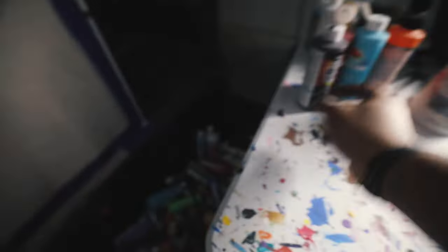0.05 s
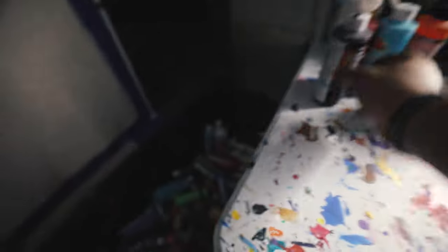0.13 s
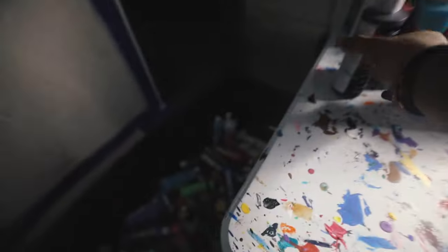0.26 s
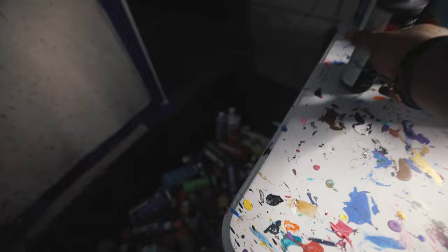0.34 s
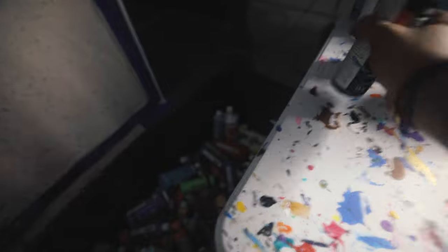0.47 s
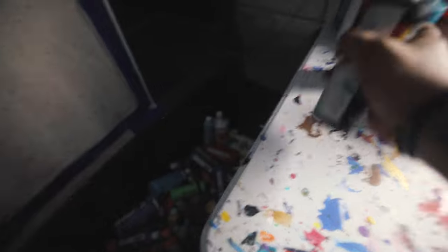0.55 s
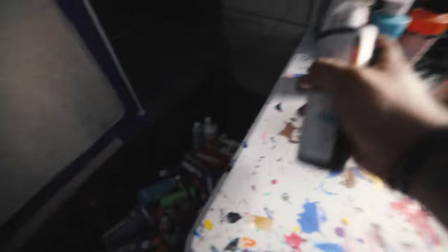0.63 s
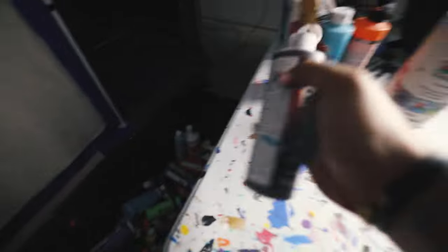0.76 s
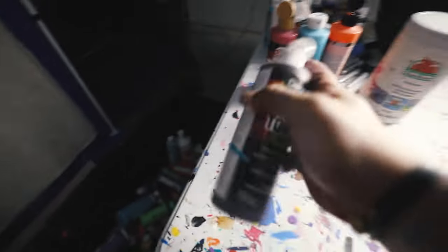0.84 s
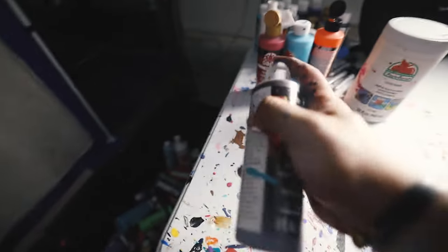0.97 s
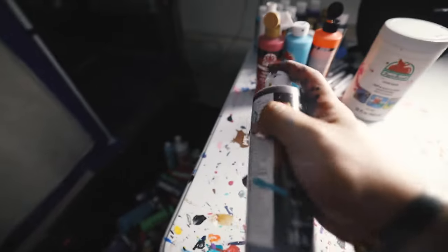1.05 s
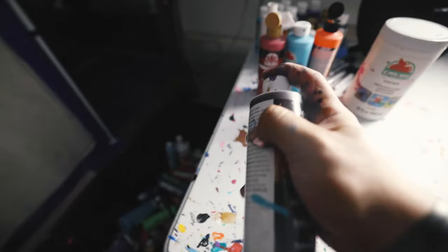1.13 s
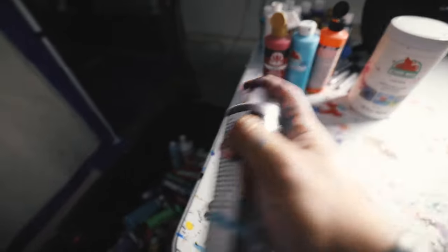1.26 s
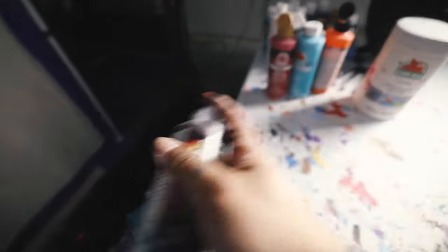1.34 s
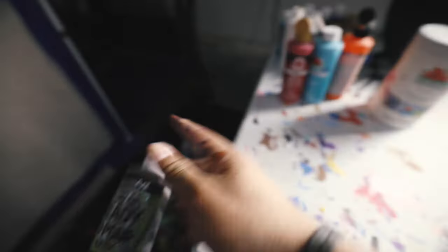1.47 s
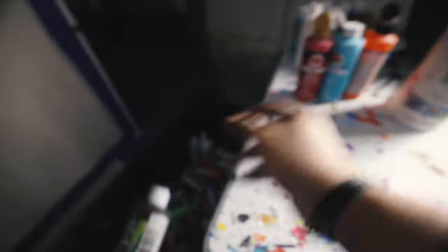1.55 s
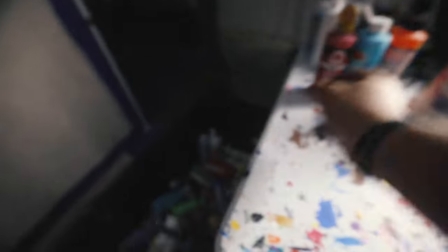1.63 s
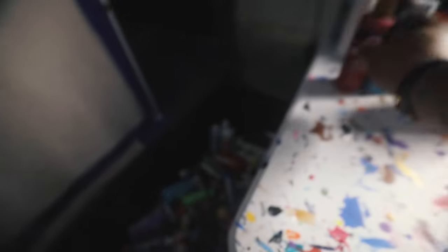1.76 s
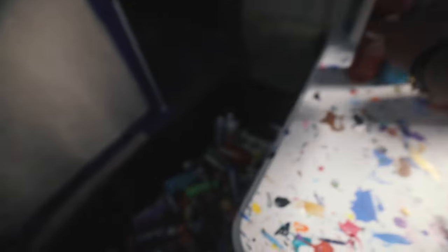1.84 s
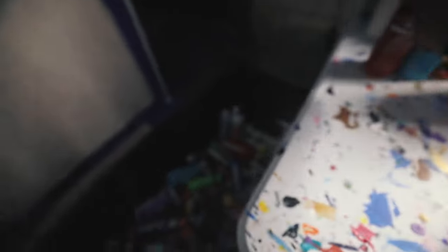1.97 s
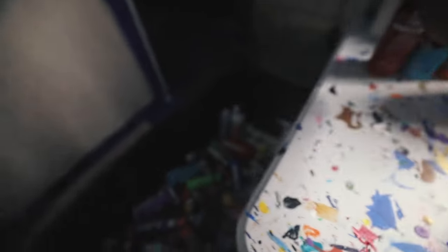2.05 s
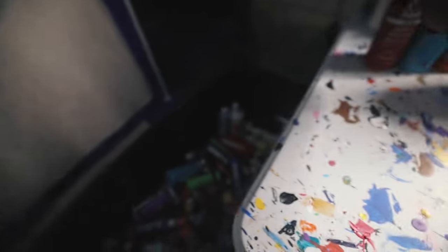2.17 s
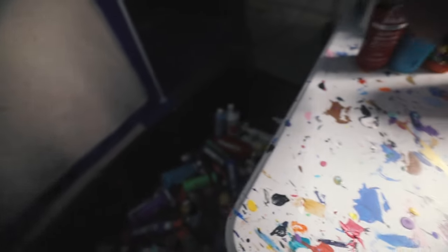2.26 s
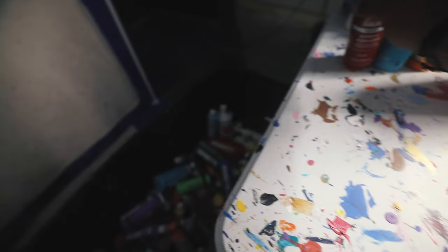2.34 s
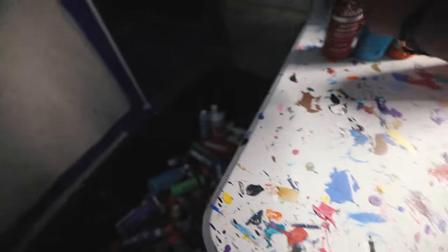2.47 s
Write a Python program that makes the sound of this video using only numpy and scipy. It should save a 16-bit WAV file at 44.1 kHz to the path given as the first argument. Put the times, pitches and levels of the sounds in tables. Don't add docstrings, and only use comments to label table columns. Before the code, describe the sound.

A plastic bottle knocks down and wobbles on a table, a hand brushes plastic, a flip cap clicks open with a short hiss, then another bottle lands hard; small quiet room, camera microphone nearby.

```python
import sys
import numpy as np
from scipy import signal
from scipy.fft import rfft, irfft, next_fast_len
from scipy.io import wavfile
from scipy.ndimage import uniform_filter1d

SR = 44100
rng = np.random.default_rng(int(sys.argv[2]) if len(sys.argv) > 2 else 0)


def boost_factor(decibels):
    exponent = np.asarray(decibels, float) / 20
    return 10 ** exponent


def dump_mix(stems):
    frames = np.atleast_2d(stems).T
    limited = np.clip(frames, -1, 1)
    pcm = np.round(limited * 32767).astype(np.int16)
    wavfile.write(sys.argv[1], SR, pcm)


N = 110250


def unit(x):
    return x / np.sqrt(np.mean(x ** 2) + 1e-20)


def along(points, hz):
    f, v = np.transpose(points)
    return np.interp(np.log(hz + 1), np.log(f + 1), v)


def filtered(x, response):
    m = next_fast_len(len(x) + 4096)
    return irfft(rfft(x, m) * response(np.fft.rfftfreq(m, 1 / SR)), m)[:len(x)]


def resonances(peaks, f):
    total = 0
    for k, (centre, width, db) in enumerate(peaks):
        damping = 1j * f * width
        total = total + (-1) ** k * boost_factor(db) * damping / (centre * centre - f * f + damping + 1e-9)
    return total


def causal(gain):
    c = irfft(np.log(gain + 1e-6))
    half = len(c) // 2
    c[1:half] *= 2
    c[half + 1:] = 0
    return np.exp(rfft(c))


def rush(spectrum, patchy_db, tones=()):
    z = signal.stft(rng.standard_normal(N), nperseg=512)[2]
    field = uniform_filter1d(rng.standard_normal(z.shape), size=5, axis=0)
    field = uniform_filter1d(field, size=4, axis=1)
    x = signal.istft(z * boost_factor(patchy_db * unit(field)), nperseg=512)[1][:N]
    return unit(filtered(x, lambda f: boost_factor(along(spectrum, f)) * (1 + np.abs(resonances(tones, f)))))


def place(hits):
    out = np.zeros(N + SR)
    for s, db, x in hits:
        out[max(round(s * SR), 0):][:len(x)] += boost_factor(db) * x / np.abs(x).max()
    return out[:N]


def hum():
    # frequency in Hz, density in dB per Hz
    rumble = [(24, -87), (40, -37), (119, -2.5), (156, -15), (301, -22.5), (356, -26.5), (600, -26.5),
              (780, -65), (1320, -120)]
    # frequency in Hz, density in dB per Hz
    breath = [(290, -77), (500, -15), (859, -8.5), (1350, -11.5), (1710, -15.5), (6000, -32),
              (14900, -39.5), (16500, -53)]
    # frequency in Hz, width in Hz, level in dB
    fan_tones = [(906, 45, 2), (3380, 270, 4)]
    return boost_factor(-44) * rush(rumble, patchy_db=0.0) + boost_factor(-53) * rush(breath, patchy_db=-2.0, tones=fan_tones)


def brushing():
    # start in seconds, length in seconds, level in dB
    brushes = [(0.0, 0.058, -55), (0.57, 0.037, -63), (0.608, 0.12, -49.5), (0.738, 0.069, -53.5),
               (0.801, 0.051, -51), (0.853, 0.074, -54.5), (0.931, 0.026, -48), (0.959, 0.062, -55),
               (1.031, 0.14, -62.5), (1.393, 0.1, -58), (2.47, 0.078, -57.5)]
    # frequency in Hz, density in dB per Hz
    skin = [(880, -28), (1500, -3), (2050, 0), (11800, -12.5), (15700, -24), (16500, -47)]
    edge_s = 0.011
    t = np.arange(N) / SR
    strokes = np.zeros(N)
    for s, length, db in brushes:
        inside = np.minimum(t - s, s + length - t)
        strokes += boost_factor(db) * np.clip(inside / edge_s + .5, 0, 1)
    return strokes * rush(skin, patchy_db=3.0)


def knocks():
    # start in seconds, peak in dB, brightness in dB per octave, rattle t60 in seconds
    contacts = [(0.001, -35.5, -13, 0.054), (0.01, -21, 0, 0.039), (0.015, -24, -2.5, 0.098),
                (0.024, -29.5, -2.5, 0.089), (0.204, -9, 5.5, 0.077), (0.22, -5, 1.5, 0.035),
                (0.226, -11.5, -1.5, 0.049), (0.233, -16, -4, 0.068), (0.247, -17.5, 2.5, 0.095),
                (0.37, -22.5, -5, 0.009), (0.443, -26, 1, 0.017), (0.4475, -18, 4, 0.045),
                (0.454, -26, -9.5, 0.036), (0.469, -16, 1.6, 0.043), (0.477, -22.5, -2, 0.02),
                (0.496, -16.5, -3.5, 0.017), (0.502, -23.5, -7, 0.033), (0.513, -25, 0, 0.029),
                (0.522, -37, -2, 0.018), (0.531, -31, -2, 0.018), (0.5393, -20, -0.5, 0.065),
                (0.545, -28, 0, 0.039), (0.646, -29.5, -15, 0.025), (1.8679, -7, 4, 0.045),
                (1.884, -2, 6, 0.017), (1.8875, -3, -3.5, 0.015), (1.899, -17.5, -15, 0.02),
                (1.9055, -13.5, 1.5, 0.017), (1.913, -15, -7.5, 0.028), (1.923, -17, -5, 0.033),
                (1.976, -35, 12, 0.012), (1.9164, -8, 4, 0.043), (1.935, -19, 4.5, 0.038),
                (2, -21.5, -3, 0.072), (2.019, -38, -2, 0.02), (2.066, -36, -5, 0.011),
                (2.039, -24, -1.5, 0.02), (2.051, -26, -0.5, 0.013), (2.111, -20, 3.5, 0.033),
                (2.116, -27, -3.5, 0.058), (2.141, -25, 0, 0.024), (2.226, -41, -2, 0.026),
                (2.237, -26, 0.5, 0.032), (2.246, -36, 2, 0.024), (2.27, -32.5, -0.5, 0.019),
                (2.303, -41, -2, 0.02), (2.376, -30.5, 7, 0.02), (2.384, -32, 2, 0.023),
                (2.392, -33, 11, 0.019)]
    # frequency in Hz, density in dB per Hz
    plastic = [(180, -16), (300, 4.5), (522, -4), (730, -2.5), (877, -4.5), (5020, -10), (11400, -25),
               (16500, -42)]
    # frequency in Hz, width in Hz, level in dB
    shell = [(724, 94, -7), (1196, 293, 1.5), (2066, 180, 4.5), (3550, 530, -3.5)]
    shell_db, shell_scatter = 6, 0.11
    contact_s, grit_db = 0.0035, 9
    shiver_db, shiver_t60 = -12.5, 0.18
    treble_hz, treble_lasts = 4530, 0.58
    crack_db, crack_t60, crack_hz = -0.5, 0.0026, 5100
    t = np.arange(8192) / SR

    def dull(f):
        return 1 / (1 + 1j * f / treble_hz) ** 2

    hits = []
    for s, db, tilt_db, t60 in contacts:
        noise = rng.standard_normal((4, len(t)))
        detune = np.exp(shell_scatter * rng.standard_normal())

        def fade(share):
            held = np.maximum(t / share - contact_s, 0)
            rattle = boost_factor(-60 * held / np.clip(t60, .004, .06))
            return rattle + boost_factor(shiver_db - 60 * t / (share * shiver_t60))

        def colour(f):
            tilt = tilt_db * np.log2(f / 2000 + 0.4)
            wall = 1 + boost_factor(shell_db) * np.abs(resonances(shell, f * detune))
            return causal(boost_factor(along(plastic, f) + tilt) * wall)

        roughness = np.abs(unit(uniform_filter1d(noise[0], size=70)))
        grit = boost_factor(-grit_db * roughness * np.minimum(t / contact_s, 1))
        body = filtered(noise[1] * fade(1.0) * grit, dull)
        treble = filtered(noise[2] * fade(treble_lasts) * grit, lambda f: 1 - dull(f))
        noise[3, 0] = -3
        crack = boost_factor(crack_db - 60 * t / crack_t60) * filtered(noise[3], lambda f: 1j * f / crack_hz)
        hits.append((s, db, filtered(body + treble + crack, colour)))
    return place(hits)


def room(x):
    # frequency in Hz, t60 in seconds
    decay = [(300, 0.44), (5000, 0.43), (12000, 0.24)]
    stretch, delay = 4410, 200
    out = np.zeros(N + SR)
    for start in range(0, N, stretch):
        hz, t, z = signal.stft(rng.standard_normal(SR // 2), SR, nperseg=256)
        fade = boost_factor(-60 * t / along(decay, hz)[:, None])
        tail = signal.istft(z * fade, SR, nperseg=256)[1]
        wet = signal.fftconvolve(x[start:start + stretch], tail / np.linalg.norm(tail))
        out[start + delay:][:len(wet)] += wet
    return out[:N]


def table():
    # start in
    # seconds, level in dB, pitch in Hz, t60 in seconds
    thuds = [(0.013, -29, 150, 0.049), (0.016, -37.5, 318, 0.065), (0.031, -26, 174, 0.11),
             (0.074, -41.5, 247, 0.1), (0.09, -42, 133, 0.11), (0.207, -19, 150, 0.037),
             (0.222, -26, 330, 0.021), (0.218, -9, 185, 0.061), (0.2375, -5.5, 112.8, 0.2),
             (0.247, -4, 130, 0.04), (0.258, -23.5, 318, 0.052), (0.283, -31, 190, 0.049),
             (0.31, -28, 162, 0.081), (0.372, -32.5, 296, 0.063), (0.377, -26.5, 150.5, 0.076),
             (0.45, -16.5, 161.1, 0.096), (0.4729, -11, 179, 0.054), (0.506, -19.5, 120.3, 0.11),
             (0.531, -22.5, 175, 0.069), (0.5496, -11.5, 167, 0.074), (0.6, -25.5, 114, 0.55),
             (0.641, -36, 153, 0.13), (0.644, -35, 239, 0.041), (0.652, -30.5, 116, 0.086),
             (0.699, -33.5, 118, 0.11), (1.874, -7.5, 141.7, 0.053), (1.884, -16, 330, 0.028),
             (1.885, -9, 746, 0.015), (1.897, -16, 178, 0.081), (1.919, -5.5, 117, 0.17),
             (1.95, -19.5, 242, 0.055), (1.984, -16.5, 187, 0.04), (2.01, -26, 153, 0.081),
             (2.045, -20, 136, 0.073), (2.06, -18, 117.4, 0.1), (2.113, -15.5, 171, 0.042),
             (2.148, -25.5, 169.3, 0.097), (2.12, -33, 339, 0.054), (2.17, -34, 97.3, 0.22),
             (2.264, -26.5, 188, 0.1), (2.275, -39, 330, 0.068), (2.36, -37, 193, 0.08),
             (2.391, -31.5, 112, 0.076)]
    # frequency in Hz, density in dB per Hz
    board = [(40, -75), (75, -2), (115, 9.5), (190, 3.5), (260, -9), (350, -13), (500, -27.5), (800, -56.5)]
    swell_cycles = 1.55
    board_db, board_t60, board_grows = -24, 0.41, 0.7
    t = np.arange(SR // 2) / SR
    hits, energy = [], []
    for s, db, hz, t60 in thuds:
        swell = 1 - np.exp(-t * hz / swell_cycles)
        fade = boost_factor(-60 * (t / np.clip(t60, .02, .25)) ** 1.09)
        hits.append((s, db, fade * swell * np.sin(2 * np.pi * hz * t)))
        energy.append((s, board_grows * db, boost_factor(-60 * t / board_t60) * swell))
    return place(hits) + boost_factor(board_db) * place(energy) * rush(board, patchy_db=-1.5)


def cap():
    # start in seconds, peak in dB, brightness in dB per octave,
    # share of the low hollow lid from 0 to 1
    snaps = [(0.733, -37, -7, 0.35), (0.874, -37, -13, 0.1), (0.935, -38, -4, 0), (1.061, -44, -10, 0.34),
             (1.114, -33.5, 1, 0.69), (1.143, -30, -7, 0.3), (1.171, -33, -4, 0.4), (1.1802, -4, -3, 0.9),
             (1.224, 0, -3.5, 0.16), (1.25, -35, 7, 0), (1.42, -28, -2.5, 0.04), (1.455, -36, 0, 0.6),
             (1.478, -34.5, -2, 0.62)]
    # frequency in Hz, width in Hz, level in dB
    cap_modes = [(2180, 990, 10), (2680, 570, 4), (3600, 450, 1), (4900, 730, 1.5), (5820, 380, 3),
                 (8500, 580, -4.5), (9950, 660, -4.5), (12500, 830, 1)]
    # frequency in Hz, width in Hz, level in dB
    lid_modes = [(728, 260, -1.5), (980, 790, 4), (1720, 770, 4), (2326, 410, 5.5)]
    snap_s, snap_t60, after_db, after_t60 = 0.0017, 0.0054, -4, 0.094
    cap_floor_hz, lid_top_hz = 1850, 2510
    buzz_db, buzz_t60 = -39, 0.12
    pop_hz, pop_t60, pop_db = 356, 0.021, -18
    t = np.arange(4096) / SR
    pop = boost_factor(pop_db - 60 * t / pop_t60) * np.sin(2 * np.pi * pop_hz * t)

    def shape(loose):
        snap = boost_factor(-60 * np.maximum(t - snap_s, 0) / snap_t60)
        after = loose * boost_factor(after_db - 60 * t / after_t60)
        return (snap + after) * (1 - np.exp(-t / 0.0003))

    def hollow(f):
        modes = sum(np.abs(resonances([p], f)) ** 3 for p in lid_modes)
        return causal(modes / (1 + (f / lid_top_hz) ** 20))

    hits = []
    for s, db, tilt_db, low in snaps:
        noise = rng.standard_normal((2, len(t)))
        share = np.clip(low, 0, 1)
        flick = boost_factor(buzz_db - 60 * t / buzz_t60) * noise[0]
        flick[0] = -1

        def colour(f):
            tilt = boost_factor(tilt_db * np.log2(np.maximum(f / 2250, 1)))
            modes = sum(np.abs(resonances([p], f)) ** 1.33 for p in cap_modes)
            floor = 1 + (cap_floor_hz * (1 + share ** 2) / (f + 1)) ** 10
            return causal(tilt * modes / floor)

        snap = filtered(noise[1] * shape(share ** 2), colour)
        lid = filtered(flick, hollow)
        mixed = (1 - share) * snap / np.abs(snap).max() + share * lid / np.abs(lid).max()
        hits.append((s, db, mixed + pop))
    return place(hits)


def nozzle_air():
    # time in seconds, level in dB
    flow = [
        (1.226, -52),
        (1.232, -40),
        (1.29, -40),
        (1.36, -47),
        (1.42, -54.5),
        (1.49, -56.5),
        (1.505, -73),
        (1.6, -84),
    ]
    # frequency in Hz, density in dB per Hz
    jet = [(710, -61), (1200, -23), (2100, -1.5), (4240, -4), (7410, -19), (13300, -21), (16500, -62.5)]
    # frequency in Hz, width in Hz, level in dB
    jet_tones = [(2100, 390, -4), (4240, 380, 6.5), (5100, 510, 7)]
    belly_hz, belly_width, belly_db = 330, 140, -7.5
    s, db = np.transpose(flow)
    strength = boost_factor(np.interp(np.arange(N) / SR, s, db, left=-120, right=-120))
    boom = filtered(rng.standard_normal(N), lambda f: resonances([(belly_hz, belly_width, 0)], f) ** 2)
    hiss = rush(jet, patchy_db=-3, tones=jet_tones)
    return strength * (hiss + boost_factor(belly_db) * unit(boom))


def scene():
    background, strokes = hum(), brushing()
    bottles, snaps = knocks(), cap()
    wet = room(boost_factor(-9.5) * bottles + boost_factor(-21.5) * snaps)
    return (background + strokes + bottles + wet + table() + snaps + nozzle_air())[None]


def band_limit(x):
    return signal.sosfilt(signal.butter(12, 16810, fs=SR, output="sos"), x)


def record(dry):
    low_hz, top_hz = 62.8, 16750
    dip_hz, dip_width, dip = 505, 150, 0.58
    shelf_hz, shelf_width, shelf_db = 15850, 90, -24

    def colour(f):
        shelf = boost_factor(shelf_db / (1 + np.exp((shelf_hz - f) / shelf_width)))
        treble = causal(shelf * (f < top_hz) + boost_factor(-74))
        bass = (1j * f / (low_hz + 1j * f)) ** 4
        return treble * bass * (1 - dip * resonances([(dip_hz, dip_width, 0)], f))

    heard = filtered(dry[0], colour)[None]
    return band_limit(heard / (1 + np.abs(heard) ** 10) ** (1 / 10))


dry = scene()
out = record(dry)
dump_mix(out)
```